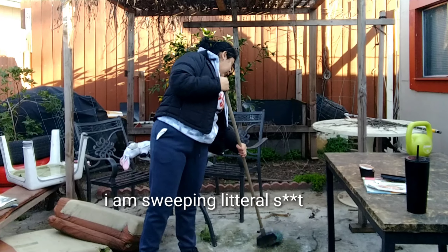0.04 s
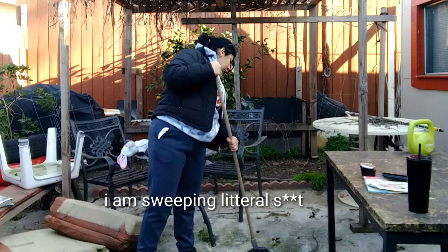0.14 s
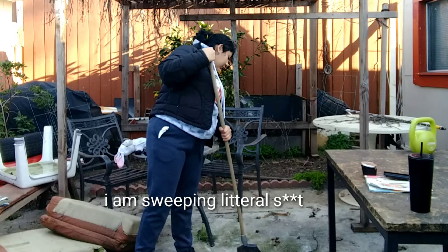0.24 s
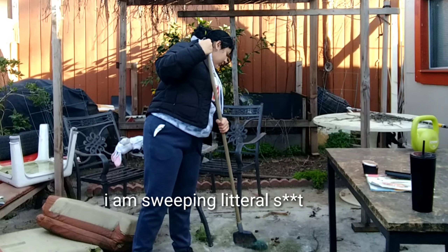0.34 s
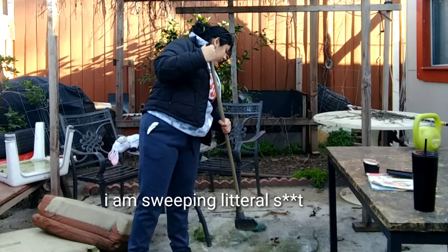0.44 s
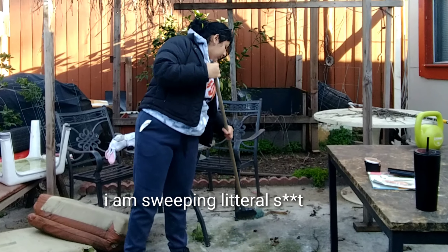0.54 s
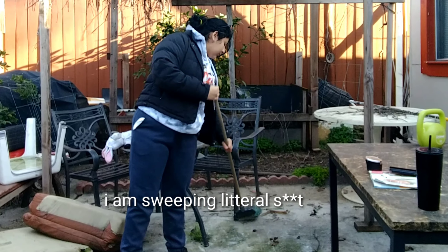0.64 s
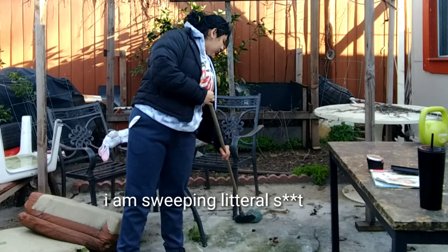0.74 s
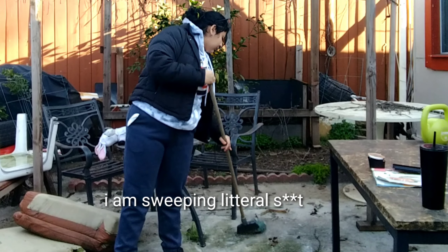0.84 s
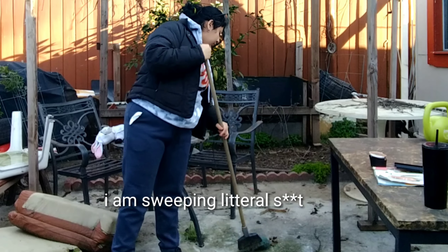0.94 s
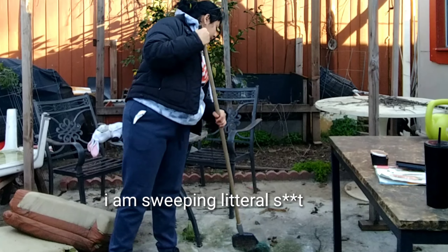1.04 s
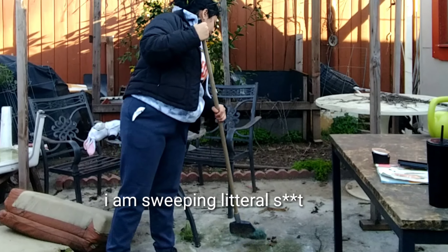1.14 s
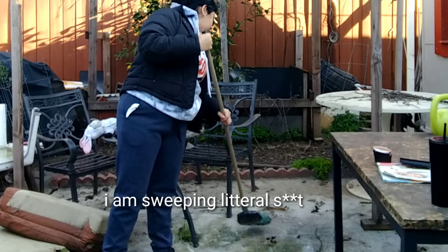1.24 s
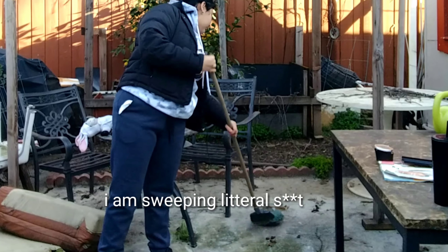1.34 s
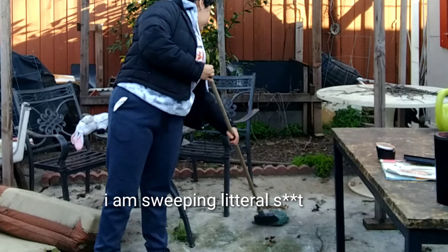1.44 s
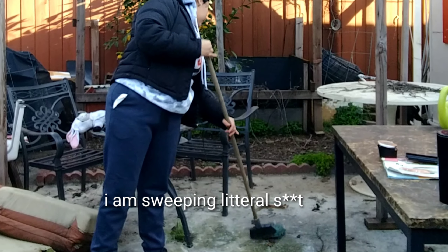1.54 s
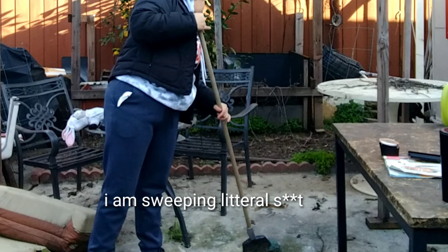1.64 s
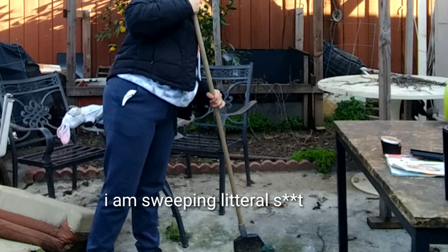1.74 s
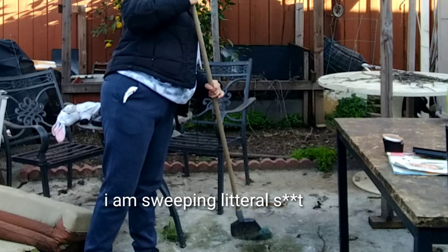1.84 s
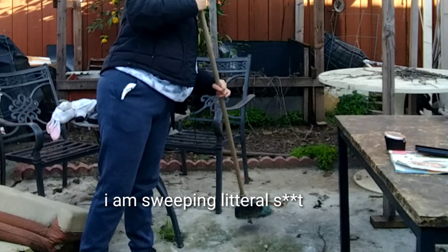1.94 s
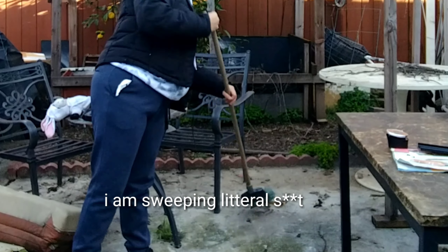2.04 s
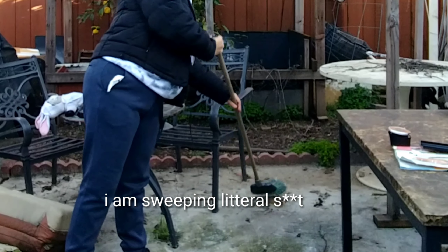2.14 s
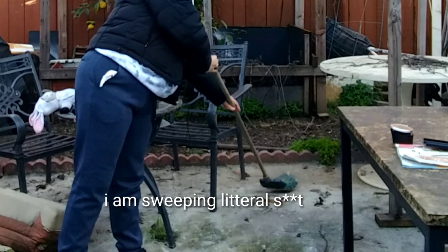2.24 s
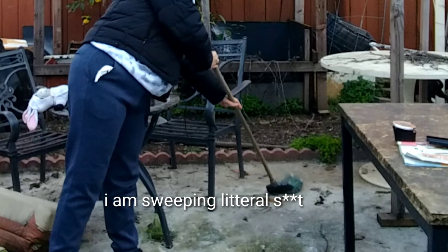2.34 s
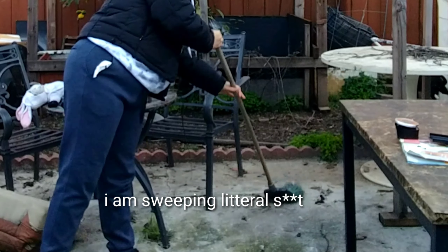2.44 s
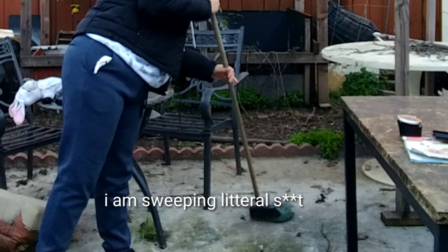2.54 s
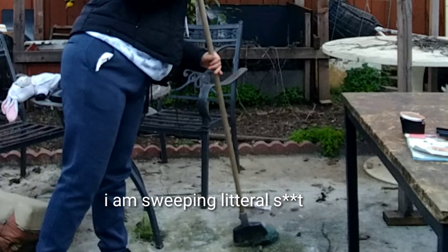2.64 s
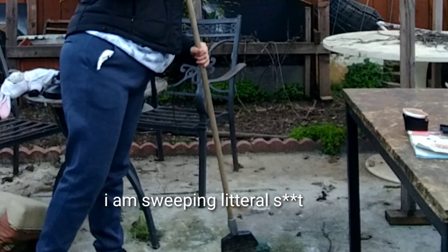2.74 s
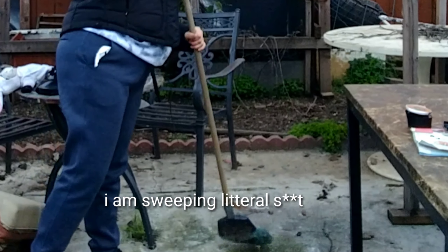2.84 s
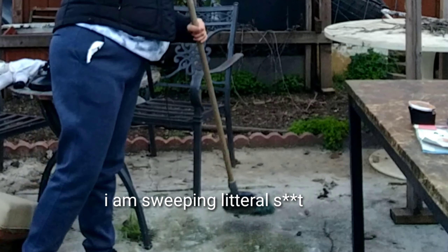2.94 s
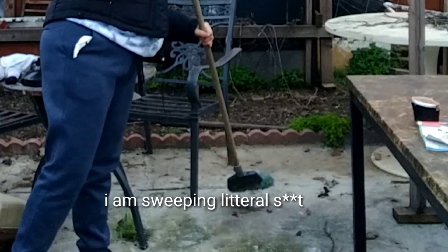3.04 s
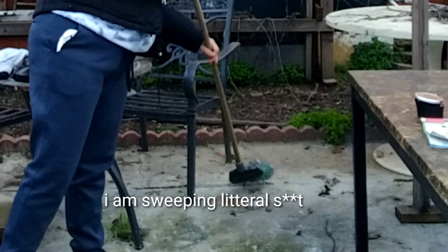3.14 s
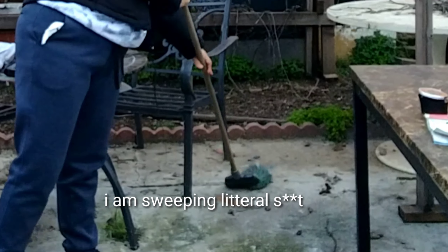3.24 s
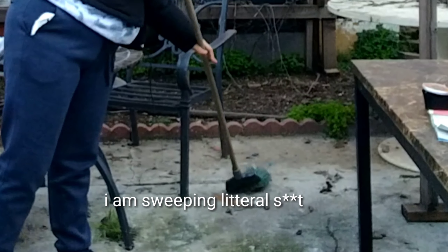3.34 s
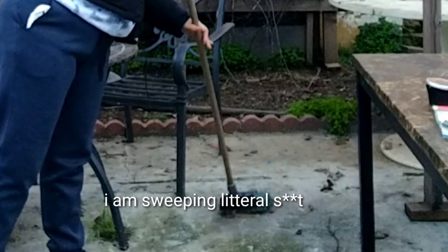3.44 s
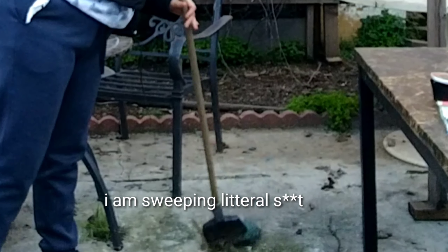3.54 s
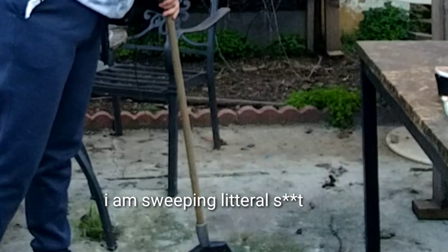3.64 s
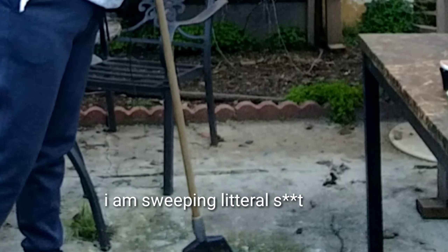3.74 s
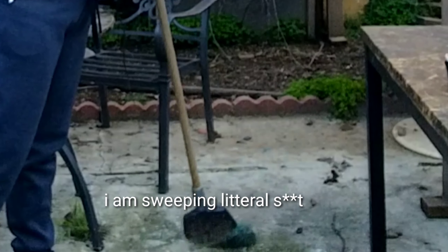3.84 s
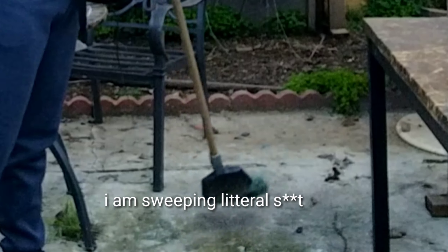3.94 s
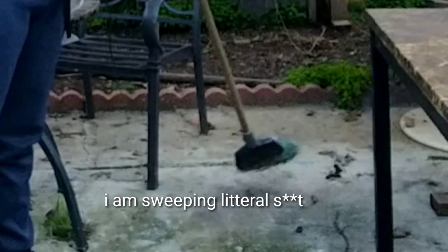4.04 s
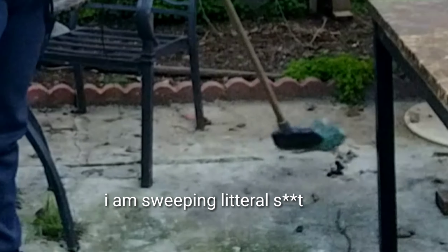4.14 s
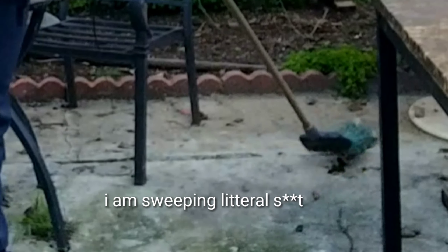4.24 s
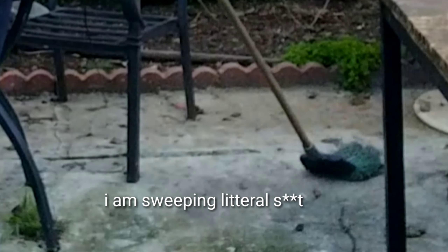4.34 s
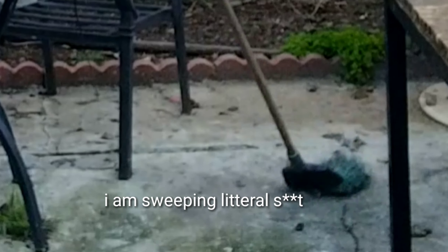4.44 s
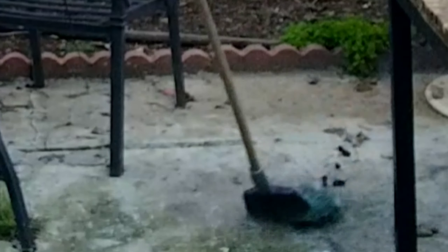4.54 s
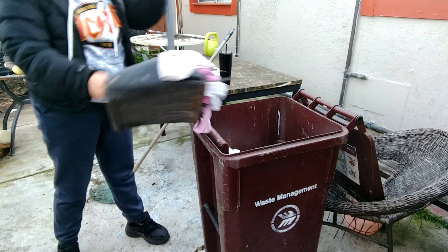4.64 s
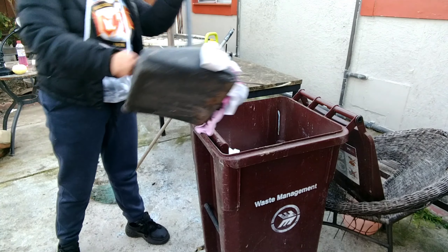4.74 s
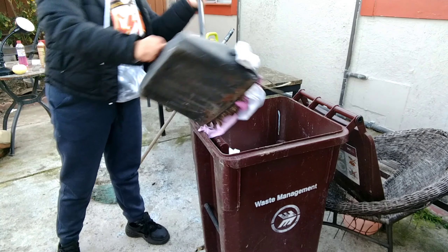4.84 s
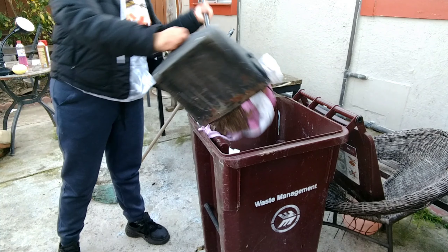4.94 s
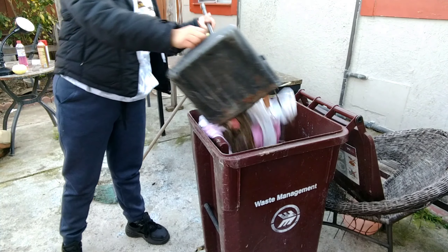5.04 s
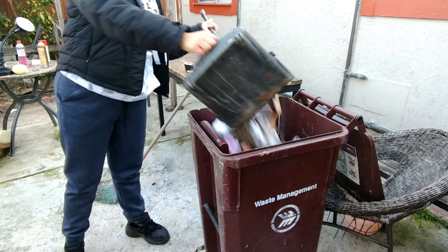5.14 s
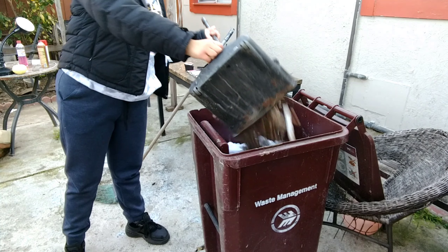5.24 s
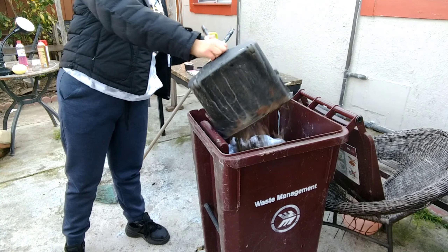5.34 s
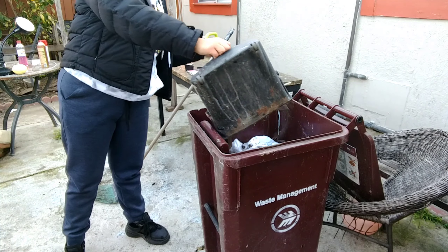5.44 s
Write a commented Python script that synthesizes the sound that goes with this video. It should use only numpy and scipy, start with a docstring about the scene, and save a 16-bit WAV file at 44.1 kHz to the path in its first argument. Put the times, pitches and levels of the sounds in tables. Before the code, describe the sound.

Outdoor patio sweeping: dry, hissing bristle strokes with ticking grit, followed by a pan of debris sliding and knocking into a plastic wheelie bin.

```python
"""On a concrete patio, a stiff broom sweeps in six strokes and flicks grit, while far traffic drones
and a distant engine hums. Then a dustpan is tipped into a plastic wheelie bin: litter slides and knocks.
Broom and litter are crowds of tiny random snaps; chips, hard clicks and bin walls are fading tones with
noise; the engine and traffic are wavering tones with soft noise. Two close microphone ports give wide stereo."""
import sys
import numpy as np
from scipy import signal
from scipy.fft import rfft, irfft, next_fast_len
from scipy.io import wavfile

SR = 44100
rng = np.random.default_rng(int(sys.argv[2]) if len(sys.argv) > 2 else 0)


def output_pcm(signal):
    """Save a mono or channel-first signal as 16-bit PCM at the path in sys.argv[1].

    Samples are clipped to [-1, 1] before scaling.
    """
    pcm = np.clip(np.atleast_2d(signal).T, -1, 1) * 32767
    wavfile.write(sys.argv[1], SR, np.round(pcm).astype(np.int16))


N = 242882
T = np.arange(N) / SR  # time in seconds

# Levels in the tables are relative: the functions add gains of their own.
# A spectrum lists power per Hz; t60 is the time a sound takes to fade by 60 dB.

# far traffic, strength of its drone: t/s, level/dB
TRAFFIC = [(0.0, -43), (0.03, -48), (0.99, -47), (1.03, -42), (1.62, -45.5), (1.76, -49.5), (2.6, -46),
           (2.65, -39.5), (4.0, -45.5), (4.06, -49), (4.55, -40), (4.66, -61), (4.78, -41.5), (4.84, -84),
           (5.45, -47), (5.5, -59)]
# centre of the drone's wandering pitch: t/s, f/Hz
DRONE = [(0, 188), (0.5, 180), (1.3, 187), (2.25, 195), (2.6, 174), (2.9, 178), (3.3, 182), (3.8, 175),
         (4.6, 176), (5.5, 192)]
# brief surges of the drone: middle t/s, length/s, level/dB
SURGES = [(1.232, 0.025, -38), (1.362, 0.036, -39), (3.285, 0.052, -51)]
# spectrum of the far noises: f/Hz, level/dB
AIR_SPECTRUM = [(25, 7), (45, -15), (65, -3.5), (100, -5.5), (190, 1), (260, -8), (450, -14.5),
                (800, -16.5), (1400, -26.5), (2200, -33.5), (5500, -44), (9000, -35.5), (14000, -41)]
# the background dips briefly: t/s, level/dB
DIP = [(4.795, 0), (4.812, -7), (4.835, -8), (4.885, 0)]

# distant engine, strength of its low note, roar and rumble: t/s, level/dB
ENGINE_LOW = [(0.0, -66), (0.03, -54.5), (0.99, -63), (2.05, -55), (2.26, -45.5), (3.35, -45), (3.69, -42),
              (3.84, -48), (4.55, -43), (4.64, -51), (5.16, -68), (5.5, -60)]
# strength of its upper note: t/s, level/dB
ENGINE_UPPER = [(0.0, -55), (0.17, -55.5), (0.99, -47.5), (1.44, -62.5), (1.98, -45.5), (2.51, -46.5),
                (2.82, -65), (3.14, -44), (3.66, -51.5), (4.44, -43.5), (4.93, -72), (5.04, -65),
                (5.12, -90), (5.5, -46)]
# it speeds up a little under load: t/s, low note f/Hz, upper note f/Hz
SPEED = [(0, 73, 118), (1.2, 76, 120.5), (2, 78, 125.2), (2.8, 80, 129.2), (3.6, 81, 131),
         (4.5, 80.5, 130.4), (5.5, 75, 126.6)]
# thin whine that comes with the engine, three tones: f/Hz
WHINE = [302, 404, 504]
# each whine tone swells and fades on its own: t/s, low level/dB, middle level/dB, high level/dB
WHINE_SWELL = [(0, -68, -64, -70), (2.5, -66, -63, -68), (2.85, -63, -68, -72), (3.0, -62, -58, -57),
               (3.22, -55, -58, -66), (3.4, -56, -56, -68), (3.55, -55, -66, -66), (3.68, -58, -61, -65),
               (3.77, -66, -49.5, -57), (4.0, -70, -49.5, -61), (4.13, -57, -54.5, -68),
               (4.38, -57, -53.5, -53.5), (4.53, -58, -54, -58), (4.65, -68, -67, -70),
               (5.51, -74, -72, -77)]

# faint rustles, mostly between strokes: middle t/s, length/s, level/dB
RUSTLE = [(0.52, 0.26, -60), (0.76, 0.16, -52.5), (1.48, 0.091, -49.5), (1.9, 0.62, -59.5),
          (2.27, 0.27, -51.5), (3.25, 0.3, -52.5), (3.42, 0.25, -50), (3.9, 0.15, -47), (4.25, 0.77, -52.5),
          (4.83, 0.046, -60)]

# larger chips of grit: t/s, ring level/dB, ring f/Hz, bright tick level/dB, dull click level/dB
GRIT = [(0.4259, -57, 5500, -39, -55), (0.5045, -46, 5440, -32.5, -66), (0.863, -36, 5600, -30, -49),
        (1.192, -35, 5960, -61, -61), (1.865, -42, 5670, -44, -58), (1.908, -38, 5600, -58, -58),
        (2.0231, -30, 5890, -36, -54), (2.2548, -40, 5580, -48, -56), (2.5927, -28, 5560, -17, -39),
        (2.5985, -20, 5530, -29, -32), (2.6068, -19, 5630, -32, -22.5), (2.985, -55, 5500, -46, -64),
        (3.003, -60, 5700, -41, -67), (3.1033, -50, 5600, -41, -64), (3.115, -57, 5600, -43, -64),
        (3.3358, -29, 5550, -33, -40), (3.379, -46, 5500, -33, -56), (3.5357, -22, 5600, -22, -28),
        (3.703, -12.5, 5660, -28, -30), (3.706, -18, 5750, -34, -29), (3.7214, -21, 5730, -38, -37),
        (3.8148, -30, 5560, -36, -40), (3.8713, -26, 5670, -37, -35), (3.975, -38, 5700, -39, -46),
        (4.0083, -50, 5140, -31, -52), (4.9862, -25, 5500, -54, -52), (5.082, -31, 5400, -47, -34),
        (5.147, -23, 5370, -27, -35), (5.162, -28, 5470, -38, -30.5), (5.206, -40, 5670, -25, -26.5),
        (5.35, -12, 5450, -19, -42), (5.416, -11, 5560, -36, -29), (5.4768, -12, 5440, -21, -26)]
# a pebble skids under the head: middle t/s, length/s, level/dB
SKIDS = [(2.562, 0.044, -35), (2.601, 0.015, -33.5), (3.54, 0.052, -29)]
SKID_HZ, SKID_WIDTH_HZ = 5630, 1500

# hard clicks of the broom head and of struck grit: t/s, level/dB
HARD_CLICKS = [(2.0231, -43), (2.5928, -25), (3.8148, -37), (3.8696, -36), (4.1431, -29.5), (4.1618, -40)]
# short tones that make up each hard click: f/Hz, level/dB, t60/s
CLICK_TONES = [(1150, 0, .007), (2900, -3.5, .005), (5400, -11, .004)]
RATTLE_DB, RATTLE_T60 = -16, 0.07  # level against the click; fade in s

# broom strokes: bristles land t/s, full pressure t/s, release t/s, level/dB, build-up/dB,
# extra fade/(dB per s), low scrape against the hiss/dB, tip fizz against the hiss/dB
STROKES = [(0.0, 0.237, 0.24, -43.5, 9, 144, 3, 0.5), (0.776, 0.934, 1.007, -43, 19, 105, 4.5, -0.5),
           (1.533, 1.649, 1.679, -41.5, 22, 81, 4, 0.5), (2.418, 2.626, 2.748, -41.5, 13.5, 97, 2, 0),
           (3.447, 3.53, 3.738, -38.5, 16, 114, 0, 0.5), (4.385, 4.572, 4.556, -40, 20, 20.5, 0, 1)]
# spectrum of the bristles on concrete: f/Hz, level/dB
BRISTLE_SPECTRUM = [(150, -48), (450, -1), (800, 3.5), (1100, 2.5), (1600, 2), (2200, -2.5), (2700, -1.5),
                    (3300, -6.5), (4000, -1), (4600, -3.5), (5700, 0), (7000, -5), (8900, -9), (10500, -5),
                    (13000, -7.5), (14500, -10.5)]
# the bristle tips slap down: t/s, level/dB, fizz against the rest/dB
SLAPS = [(0.075, -51, 4), (0.78, -52.5, 6.5), (0.85, -54, 9), (1.477, -44, 1.5), (1.555, -61, 10),
         (3.484, -38.5, 2), (4.391, -51, 10.5), (4.442, -52.5, 13.5), (4.475, -65, 8), (4.69, -47, -5)]
SLAP_RISE_S, SLAP_T60 = 0.019, 0.31
TIP_LEAD_S, HEAD_LAG_S = 0.0019, 0.002  # the tips fizz first; the weight of the head follows
LAND_S = 0.022  # time the bristles take to land
SAG_DB_PER_S = 16  # the push weakens as the arms extend
STOP_S = 4.795  # the broom sound breaks off abruptly here

# the pan tips and a trickle grows; then the heap slides off and thins out
TIP_S, HEAP_S, THIN_S = 4.717, 5.207, 5.432
# spectrum of the dry litter: f/Hz, level/dB
LITTER_SPECTRUM = [(120, -18), (200, -8), (280, -18), (420, -9), (650, -8.5), (950, -11.5), (1450, -17),
                   (2200, -14.5), (3300, -14), (5500, -7), (6800, -9.5), (8700, -14.5), (10500, -13),
                   (14000, -18)]

# lumps landing in the bin: t/s, crack level/dB, thud of the walls level/dB,
# boom below 350 Hz against the thud/dB, slap above 700 Hz against the thud/dB, share of the full ring time
KNOCKS = [(4.853, -42, -48, 2, -2, 0.9), (4.876, -45, -44.5, 6.5, -3, 0.73), (4.951, -28, -48, -4, 0, 0.55),
          (5.021, -45, -54, 17, -6, 0.91), (5.066, -41, -54, -3, 2, .8), (5.1137, -30, -30.5, -7, -2, 1),
          (5.128, -22, -32, -4.5, -3.5, 1), (5.168, -36, -38.5, 4, -2, 1),
          (5.2143, -14, -29.5, 0, -1.5, .6), (5.229, -33, -32.5, -6, -2, 0.59),
          (5.247, -30, -26, -7, -8.5, 1), (5.2635, -32, -27.5, -9, -6, 0.92),
          (5.2695, -26, -35, -8, -3, 0.85), (5.287, -30, -37, -1, -1, 0.83),
          (5.312, -33, -29.5, -8, -8, 0.87), (5.335, -34, -27.5, -11, -9, 0.92),
          (5.342, -26, -28, -13, 0, 0.56), (5.357, -27, -34, 14.5, -11, 0.55),
          (5.3605, -16, -35, 0, -5, 0.6), (5.372, -18, -30.5, -11, -2, 0.49),
          (5.392, -21, -31.5, 1, 2.5, 0.54), (5.404, -16, -28.5, 3, -1, 0.84),
          (5.423, -25, -31.5, -5, -1, 0.85), (5.448, -34, -37, 9, -1, 0.88), (5.474, -31, -35, -5, 3.5, 1)]
# ringing tones of the bin's plastic walls: f/Hz, level/dB, full ring t60/s
BIN_WALLS = [(222, -5, .08), (266, -3, .09), (315, -4, .05), (400, -3, .06), (445, 4.5, .12),
             (505, -6, .06), (563, -2, .1), (610, -5, .1), (680, -3, .1), (732, -3, .11), (890, -6, .06),
             (937, 1, .12), (1017, -4, .09), (1122, -5, .09), (1224, -3, .09), (1449, -1, .09),
             (1603, -6, .07)]
PUNCH_HZ, PUNCH_T60 = 700, 0.008

# first echoes from ground, table and wall: delay t/s, level/dB
ECHOES = [(0.0031, -27.5), (0.0058, -18), (0.0094, -12), (0.0151, -13.5)]
ECHO_TOP_HZ = 7100  # rough surfaces return little of the treble
# how alike the two ports are before their phase turns: f/Hz, likeness from 0 to 1
LIKENESS = [(80, .9), (200, .72), (400, .68), (700, .88), (1100, .98), (2000, .996), (4600, .998),
            (5500, .82), (6600, .93), (7500, .5), (9500, .15)]
# left over right for near sounds: f/Hz, level/dB
BALANCE = [(200, 1), (550, 3), (1100, 0), (1500, -1.5), (2100, 0), (2300, 0), (2700, 2), (3300, .3),
           (4600, 0), (5700, 5.5), (6600, 1), (9000, 3), (11000, 8.5), (15000, 5.5)]
EDGE_HZ = 15650  # upper band limit


def gain_of(db):
    """Turns decibels into amplitude."""
    return 10 ** (np.asarray(db) / 20)


def evened(x):
    """Scales a sound to an average strength (rms) of 1."""
    return x / np.sqrt(np.mean(x ** 2) + 1e-20)


def read(points, hz):
    """Reads a table between its points, with frequency on a log axis."""
    f, value = np.transpose(points)
    return np.interp(np.log(hz + 1), np.log(f + 1), value)


def shaped(x, response):
    """Filters a sound by a gain that depends on frequency."""
    size = next_fast_len(x.shape[-1] + 2000)
    gain = response(np.fft.rfftfreq(size, 1 / SR))
    return irfft(rfft(x, size) * gain, size)[..., :x.shape[-1]]


def band(x, spectrum, lo_hz, hi_hz):
    """Cuts one soft-edged band, coloured by a spectrum, at rms 1."""
    def response(f):
        edges = np.sqrt((1 + (lo_hz / (f + 1)) ** 8) * (1 + (f / hi_hz) ** 8))
        return gain_of(read(spectrum, f)) / edges
    return evened(shaped(x, response))


def drift(hz):
    """Slow random wandering of rms 1, up to about hz."""
    return evened(shaped(rng.standard_normal(N), lambda f: np.exp(-(f / hz) ** 2)))


def add(mix, s, sound):
    """Mixes a sound in at time s, cut off at the end of the mix."""
    part = mix[:, round(s * SR):][:, :sound.shape[-1]]
    part += sound[..., :part.shape[-1]]


def curve(rows):
    """Reads amplitude over time from a table of t/s, level/dB."""
    return gain_of(np.interp(T, *np.transpose(rows)))


def onset(s, rise_s):
    """Opens from 0 to 1, starting at time s."""
    return np.clip((T - s) / rise_s, 0, 1)


def swells(rows):
    """Smooth rises and falls, each about 9 dB down at the ends of its length."""
    return sum(gain_of(db) * np.exp(-(2 * (T - s) / length) ** 2) for s, length, db in rows)


def bursts(rows, rise_s, t60):
    """Quick rises that die away."""
    return sum(onset(s, rise_s) * gain_of(db - 60 * np.maximum(T - s - rise_s, 0) / t60)
               for s, db in rows)


def grains(per_s, spread_db, t60, blur):
    """A crowd of tiny snaps of uneven size; blur is the share of power scattered by the surroundings."""
    sizes = gain_of(spread_db * np.minimum(rng.exponential(1, N), 5))
    power = (rng.random(N) < per_s / SR) * sizes ** 2
    power = signal.lfilter([1], [1, -np.exp(-2 * np.log(1000) / (t60 * SR))], power)  # each snap fades
    blur = np.clip(blur, 0, 1)
    return np.sqrt((1 - blur) * power / power.mean() + blur) * rng.standard_normal((2, N))


def note(hz, waver_hz, flutter_db, pace_hz):
    """A far tone of rms near 1 whose pitch and strength wander at the given pace."""
    turns = np.cumsum(hz + waver_hz * drift(pace_hz)) / SR
    return np.sqrt(2) * np.sin(2 * np.pi * turns) * gain_of(flutter_db * drift(pace_hz))


def neighbourhood():
    """Traffic gives a wavering low drone, over a broad wash, some bass and a steady thin hiss."""
    blur, wash, hiss, bass = rng.standard_normal((4, 2, N))
    tone = note(np.interp(T, *np.transpose(DRONE)), waver_hz=7.04, flutter_db=3.0, pace_hz=22.54)
    tone = tone * np.array([[1], [0]])  # only the first channel; ports() spreads it
    drone = (gain_of(-1.0) * curve(TRAFFIC) + swells(SURGES)) * tone
    drone += gain_of(-4.5) * curve(TRAFFIC) * band(blur, AIR_SPECTRUM, lo_hz=165, hi_hz=267)
    wash = gain_of(-47.5) * band(wash, AIR_SPECTRUM, lo_hz=230, hi_hz=1590)
    hiss = gain_of(-57) * band(hiss, AIR_SPECTRUM, lo_hz=2320, hi_hz=17000)
    bass = gain_of(-49.0) * band(bass, AIR_SPECTRUM, lo_hz=51.4, hi_hz=142)
    return drone + wash + hiss + bass


def engine():
    """Two low wavering notes, a thin three-tone whine and a soft roar and rumble, from far away."""
    s, low_hz, upper_hz = np.transpose(SPEED)
    load = curve(ENGINE_LOW)
    low = note(np.interp(T, s, low_hz), waver_hz=2.1, flutter_db=2.0, pace_hz=18.0)
    upper = note(np.interp(T, s, upper_hz), waver_hz=2.46, flutter_db=1.0, pace_hz=10.1)
    notes = gain_of(6) * load * low + gain_of(2.5) * curve(ENGINE_UPPER) * upper
    times, *levels = np.transpose(WHINE_SWELL)
    for hz, db in zip(WHINE, levels):
        swell = gain_of(np.interp(T, times, db) + 1)
        notes += swell * note(hz, waver_hz=1, flutter_db=1, pace_hz=6)
    roar = gain_of(-9.0) * band(rng.standard_normal((2, N)), AIR_SPECTRUM, lo_hz=243, hi_hz=680)
    rumble = gain_of(-2.0) * band(rng.standard_normal((2, N)), AIR_SPECTRUM, lo_hz=75.5, hi_hz=105)
    return notes * np.array([[1], [0]]) + load * (roar + rumble)


def rustle():
    """Faint rustles, made of sparse snaps that swell and fade, mostly between strokes."""
    crinkle = grains(per_s=400, spread_db=2.2, t60=0.005, blur=0.65)
    return swells(RUSTLE) * band(crinkle, BRISTLE_SPECTRUM, lo_hz=1160, hi_hz=13600)


def stray_grit():
    """Loose crumbs tick faintly as they settle, at random moments throughout."""
    ticks = grains(per_s=45, spread_db=1.5, t60=0.03, blur=0)
    return gain_of(-66) * band(ticks, BRISTLE_SPECTRUM, lo_hz=5000, hi_hz=16000)


def grit(ring_width_hz=260):
    """Each chip gives a bright tick, a dull click and a short ring of two close tones."""
    ring_t60, click_t60, tick_t60 = .02, .011, .014
    out, t = np.zeros((2, N)), T[:3000]
    for s, db, hz, tick_db, click_db in GRIT:
        noise, phase = rng.standard_normal((2, len(t))), rng.random((2, 1))
        ring = np.sin(2 * np.pi * (hz * t + phase))
        ring += .5 * np.sin(2 * np.pi * ((hz - ring_width_hz) * t + phase))
        click = band(noise, BRISTLE_SPECTRUM, lo_hz=720, hi_hz=5870)
        tick = band(noise, BRISTLE_SPECTRUM, lo_hz=8840, hi_hz=16000)
        add(out, s, gain_of(db - 8.5 - 60 * t / ring_t60) * ring)
        add(out, s, gain_of(click_db + 1.5 - 60 * t / click_t60) * click)
        add(out, s, gain_of(tick_db - 5.0 - 60 * t / tick_t60) * tick)
    return out


def pebbles():
    """A trapped pebble chatters over the concrete with a shrill ring."""
    chatter = grains(per_s=2000, spread_db=4.5, t60=0.0036, blur=0.39)
    shrill = shaped(chatter, lambda f: 1 / (1 + ((f - SKID_HZ) / SKID_WIDTH_HZ) ** 2))
    return swells(SKIDS) * evened(shrill)


def hard_clicks():
    """Broom head and struck grit click hard: one dead snap of short tones and a brief noisy rattle."""
    rattle = band(rng.standard_normal((2, N)), BRISTLE_SPECTRUM, lo_hz=600, hi_hz=4500)
    out = gain_of(RATTLE_DB) * bursts(HARD_CLICKS, rise_s=0.0012, t60=RATTLE_T60) * rattle
    t = T[:1000]
    snap = sum(gain_of(db - 60 * t / t60) * np.sin(2 * np.pi * hz * t) for hz, db, t60 in CLICK_TONES)
    for s, db in HARD_CLICKS:
        add(out, s, gain_of(db) * snap)
    return out


def push(land, full, release, db, build_db, fade_db_per_s):
    """One stroke: pressure builds, sags slowly, and fades as the head lifts."""
    build = build_db * (1 - onset(land, full - land))
    sag = SAG_DB_PER_S * np.maximum(T - full, 0)
    fade = fade_db_per_s * np.maximum(T - release, 0)
    return onset(land, LAND_S) * gain_of(db - build - sag - fade)


def pushes(late_s):
    """The pressure of every stroke, with its peak and release moved later by late_s."""
    return np.array([push(land, full + late_s, release + late_s, db, build, fade)
                     for land, full, release, db, build, fade, _, _ in STROKES])


def sand(per_s, spread_db, cycles, lo_hz, hi_hz, count=36):
    """Rolling grains of many sizes: each rings for a few cycles at its own pitch."""
    out, t = np.zeros((2, N)), T[:1500]
    for hz in np.geomspace(lo_hz, hi_hz, count):
        sizes = gain_of(spread_db * np.minimum(rng.exponential(1, N), 3))
        clicks = (rng.random(N) < per_s / count / SR) * sizes
        ring = np.exp(-hz * t / cycles) * np.sin(2 * np.pi * (hz * t + rng.random((2, 1))))
        level = hz * gain_of(read(BRISTLE_SPECTRUM, hz))
        out += level * signal.oaconvolve(clicks[None], ring, axes=1)[:, :N]
    return evened(out)


def broom():
    """Thousands of bristles catch and spring free; tufts let go together, and dragged sand crackles."""
    tips, pressure, head = pushes(-TIP_LEAD_S), pushes(0).sum(0), pushes(HEAD_LAG_S)
    scrape_db, fizz_db = np.transpose(STROKES)[-2:]
    slap = bursts([(s, db) for s, db, _ in SLAPS], SLAP_RISE_S, SLAP_T60)
    flick = bursts([(s, db + fizz) for s, db, fizz in SLAPS], SLAP_RISE_S, SLAP_T60)
    tufts = gain_of(.6 * drift(hz=25) + 1.1 * drift(hz=170))
    snaps = grains(per_s=5000, spread_db=0.8, t60=0.0036, blur=0.4) * tufts
    scrape = np.hypot(gain_of(scrape_db - 1.4) @ head, gain_of(3.0) * slap)
    scrape = scrape * band(snaps, BRISTLE_SPECTRUM, lo_hz=452, hi_hz=2350)
    hiss = np.hypot(gain_of(1.2) * pressure, gain_of(-1.5) * slap)
    hiss = hiss * band(snaps, BRISTLE_SPECTRUM, lo_hz=2650, hi_hz=8900)
    fizz = np.hypot(gain_of(fizz_db + 1.5) @ tips, flick)
    fizz = fizz * band(snaps, BRISTLE_SPECTRUM, lo_hz=8050, hi_hz=16800)
    crackle = gain_of(.8) * sand(per_s=340, spread_db=3, cycles=10, lo_hz=900, hi_hz=9000)
    return (scrape + hiss + fizz + pressure * crackle) * (1 - onset(STOP_S, rise_s=0.023))


def flow(trickle_db, grow_db_per_s, heap_db, thin_db_per_s):
    """Strength of the pour: a growing trickle, then the whole heap, which can thin out."""
    trickle = gain_of(trickle_db + grow_db_per_s * (T - TIP_S)) * onset(TIP_S, rise_s=0.18)
    heap = gain_of(heap_db - thin_db_per_s * np.maximum(T - THIN_S, 0))
    return trickle + (heap - trickle) * onset(HEAP_S, rise_s=0.0098)


def dustpan():
    """Dry litter slides over the lip in clumps and patters into the hollow bin."""
    slide = grains(per_s=1600, spread_db=1.6, t60=0.005, blur=0.45)
    patter = grains(per_s=460, spread_db=-4.0, t60=0.013, blur=0.26)
    sliding = flow(trickle_db=-53.5, grow_db_per_s=24.5, heap_db=-29.5, thin_db_per_s=75)
    landing = flow(trickle_db=-47, grow_db_per_s=15, heap_db=-38, thin_db_per_s=0)
    landing = landing * onset(TIP_S, rise_s=.07)
    hiss = sliding * band(slide, LITTER_SPECTRUM, lo_hz=2170, hi_hz=16500)
    return hiss + landing * band(patter, LITTER_SPECTRUM, lo_hz=240, hi_hz=2390)


def knocks(slap_t60=0.035, crack_t60=0.0084, rise_s=0.0015):
    """Each lump punches, cracks and slaps on the plastic and rings its walls; soft ones damp the ring."""
    out, t = np.zeros((2, N)), T[:8000]
    hz, db, t60 = np.transpose(BIN_WALLS)[:, :, None]
    for s, peak_db, thud_db, boom_db, bright_db, ring_share in KNOCKS:
        # the wall tones start nearly together on one channel and at any phase on the other
        phase = rng.random((2, len(BIN_WALLS), 1)) * np.array([.15, 1])[:, None, None]
        colour = db + boom_db * (hz < 350) + bright_db * (hz > 700)
        modes = gain_of(colour - 60 * t / (t60 * ring_share)) * np.sin(2 * np.pi * (hz * t + phase))
        noise = rng.standard_normal((2, len(t)))
        slap = band(noise, LITTER_SPECTRUM, lo_hz=660, hi_hz=1820)
        slap = slap * gain_of(bright_db - 60 * t / slap_t60)
        body = gain_of(thud_db) * (modes.sum(1) + gain_of(6.0) * slap) * (1 - np.exp(-t / rise_s))
        crack = band(noise, LITTER_SPECTRUM, lo_hz=400, hi_hz=3470)
        crack = crack * gain_of(peak_db - 9.5 - 60 * t / crack_t60)
        punch = gain_of(peak_db - 5.5 - 60 * t / PUNCH_T60) * np.sin(2 * np.pi * PUNCH_HZ * t)
        add(out, s, body + crack + punch)
    return out


def patio(x, tail_db=-16, tail_t60=0.043):
    """Ground, table and wall add a few echoes and a short, faint tail of fading noise."""
    t = T[:9000]
    tail = rng.standard_normal((2, len(t))) * gain_of(-60 * t / tail_t60) * (t > .008)
    tail *= gain_of(tail_db) / np.linalg.norm(tail[0])
    echoes = np.zeros(len(t))
    for s, db in ECHOES:
        echoes[round(s * SR)] = gain_of(db)
    tail += shaped(echoes, lambda f: 1 / (1 + (f / ECHO_TOP_HZ) ** 4))
    return gain_of(-0.5) * (x + signal.fftconvolve(x, tail, axes=1)[:, :N])


def ports(x, step_hz):
    """Widened stereo: left and right swing between equal and opposite phase at every step of frequency."""
    def likeness(f):
        steps = f / step_hz - 1
        past = steps % 2 - 1  # the phase lingers at opposite, which hollows out the centre
        angle = np.pi * np.where(steps < 0, steps ** 5, steps - past * np.exp(-(past / .18) ** 4))
        # the bass only turns in phase; higher up the ports grow unlike between the steps
        turn = np.cos(angle) - 1j * np.sin(angle) * np.where(steps < 0, 1, .5)
        return read(LIKENESS, f) * turn
    shared = shaped(x[0], likeness)
    separate = shaped(x[1], lambda f: np.sqrt(np.maximum(1 - abs(likeness(f)) ** 2, 0)))
    return np.array([x[0], shared + separate])


def scene():
    """Near sounds mostly favour the left port in the treble; far ones arrive evenly."""
    step_hz = 1098
    far = ports(neighbourhood() + engine(), step_hz)
    sweeping = rustle() + stray_grit() + grit() + pebbles() + hard_clicks() + broom()
    near = ports(patio(sweeping + dustpan()) + knocks(), step_hz)  # the knocks get no patio echo
    # each side's gain keeps the total power of the pair
    near = shaped(near, lambda f: np.sqrt(2 / (1 + gain_of(np.outer([-1, 1], read(BALANCE, f))) ** 2)))
    return near + far * curve(DIP)


def record(dry):
    """Limits the band: a steep filter removes what lies above the upper edge."""
    low_pass = signal.firwin(511, EDGE_HZ, window=("kaiser", 9), fs=SR)
    return signal.oaconvolve(dry, low_pass[None], "same")


dry = scene()
out = record(dry)
output_pcm(out)
```